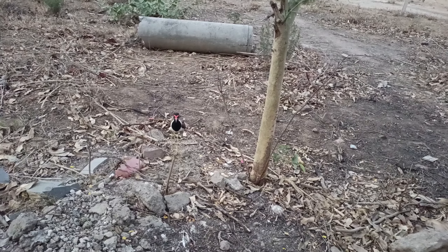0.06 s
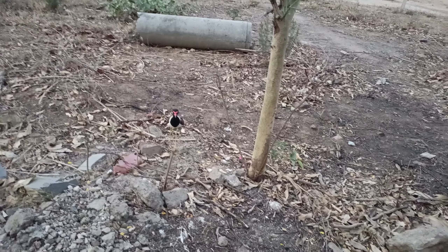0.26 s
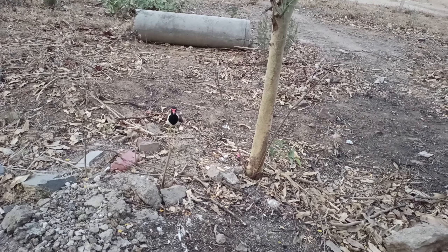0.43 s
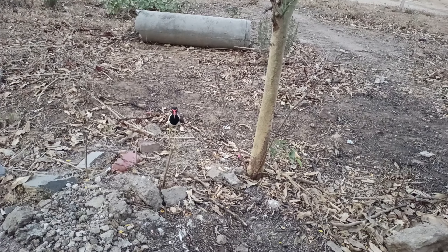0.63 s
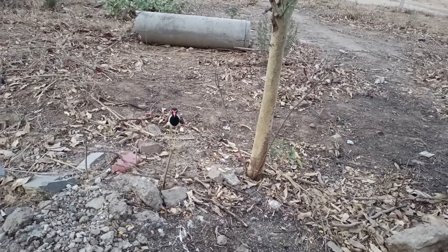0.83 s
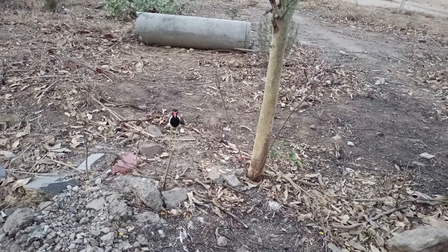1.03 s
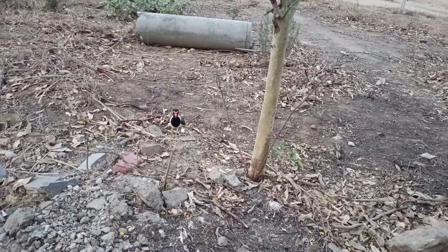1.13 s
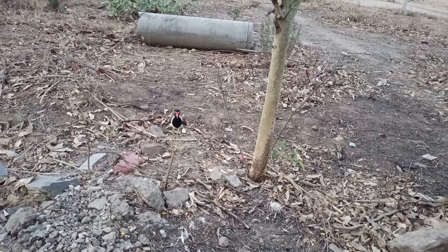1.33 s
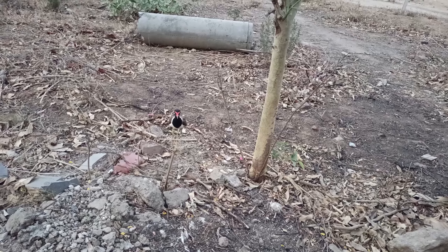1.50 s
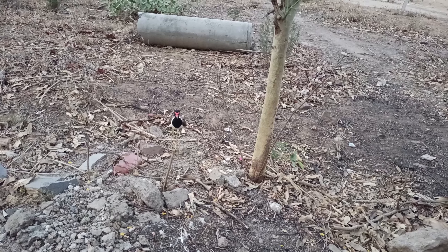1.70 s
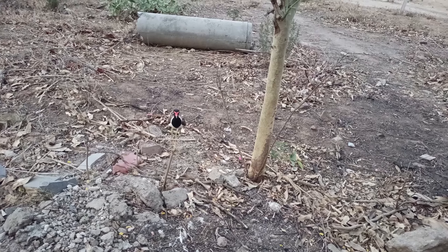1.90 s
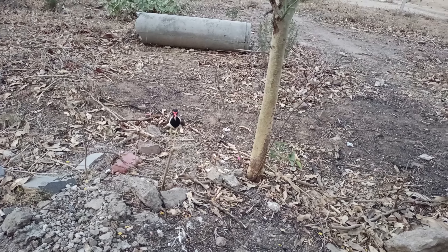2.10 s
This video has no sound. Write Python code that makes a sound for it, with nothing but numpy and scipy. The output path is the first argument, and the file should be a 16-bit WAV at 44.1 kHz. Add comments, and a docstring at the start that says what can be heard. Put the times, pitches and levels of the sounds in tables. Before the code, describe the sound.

A lapwing gives three short, loud calls left of the microphone, at about 0.2, 0.7 and 1.7 seconds. Each lasts a tenth of a second, rising from a lower note through a rasping trill to a higher note, with a soft overload thump and a ringing half-second echo. Faint high insect hiss runs throughout in the open air, with scattered distant bird chatter and whistles on the left.

```python
"""Faint insect hiss and far birds' chatter and whistles come first, over open, rubbly ground.
Then a lapwing gives three sharp calls, left of the microphone, each followed by a ringing echo.
Each uses both sides of the syrinx: a low note, a fast trill in which a high voice breaks in,
then the high voice alone. The calls overload the microphone into a soft thump."""
import sys
import numpy as np
from scipy import signal
from scipy.fft import rfft, irfft
from scipy.io import wavfile

SR = 44100
rng = np.random.default_rng(int(sys.argv[2]) if len(sys.argv) > 2 else 0)


def generate_wav(signal):
    """Clip the signal to [-1, 1] and save it as 16-bit WAV at the path in sys.argv[1]."""
    frames = np.transpose(np.atleast_2d(signal))
    scaled = np.clip(frames, -1, 1) * 32767
    pcm = np.round(scaled).astype(np.int16)
    wavfile.write(sys.argv[1], SR, pcm)


N = 94815

# spectra of the open air and of the insect chorus: f/Hz, relative level/dB
AIR_SPECTRUM = [(25, -29), (60, -7), (120, -1), (250, -10), (600, -12), (1200, -21), (3000, -24.5),
                (6000, -33), (10000, -49), (16000, -67)]
INSECT_SPECTRUM = [(6800, -45), (7500, -19), (8100, -7.5), (8500, -3), (9000, 2), (9600, -4), (9850, -36),
                   (10500, -49.5)]
# far birds' bouts of harsh chatter: t/s, length/s, centre f/Hz, level/dB
CHATTER_BOUTS = [(-.06, .13, 2288, -49.5), (-.04, 0.095, 3240, -68), (0.043, 0.16, 2104, -64),
                 (0.376, 0.084, 2348, -49.5), (0.88, 0.24, 2198, -54), (1.36, 0.093, 3440, -74),
                 (1.086, .22, 2380, -59), (1.246, .19, 2210, -64.5), (1.79, .25, 2205, -50.5),
                 (1.998, 0.3, 2252, -52.5)]
# far birds' whistles: t/s, length/s, first f/Hz, last f/Hz, width/Hz, level/dB
FAR_WHISTLES = [(0.032, 0.16, 3690, 3010, 442, -65.5), (0.134, 0.07, 973, 1010, 90.8, -68),
                (0.532, 0.23, 2675, 2768, 240.4, -60.5), (1.29, .06, 3000, 2960, 150, -67),
                (1.362, 0.3, 2480, 2497, 110, -60.5)]
# lapwing calls: start t/s, first trill pulse t/s, high voice takeover t/s, end t/s, trill f/Hz, level/dB
CALLS = [(0.2004, 0.2282, .2645, .2895, 132.8, -1), (0.741, 0.7679, .8125, .8385, 134.1, -1),
         (1.6554, 1.6844, 1.7075, 1.7375, 123.6, -1.5)]
# harmonics from the first up (low voice, high voice in the trill, high voice alone): relative level/dB
LOW_VOICE = [-15, -4.5, -9.5, -5, 0, -7.5, -15.5, -17, -15, -20.5, -15, -11.5]
TRILL_VOICE = [-34.5, -31, -9, 2, -20, -16.5, -11.5, -26, -11.5]
HIGH_VOICE = [-15.5, -12, -7, -0.5, -15, -11, -11, -35.5, -13]
# rasp of the trill: f/Hz, relative level/dB
RASP_SPECTRUM = [(500, -30.5), (1900, -26), (2750, -2), (3200, -4), (3600, -13), (4100, -12), (4500, -10.5),
                 (5300, -4), (6100, -4.5), (7000, 0), (8300, -8), (15500, -9.5)]
TAIL_BANDS = [(1310, -30, .27), (1390, -10, .36), (1600, -19.5, 0.28), (1750, -3, .27), (2045, -15, 0.27),
              (2430, -12.5, 0.45), (2688, -1, 0.6), (3050, -8, 0.4), (3320, -5, 0.39), (3650, -14.5, 0.5),
              (4150, -13.5, 0.25), (4370, -31.5, 0.14), (4740, -14.5, .25), (5024, -13.5, 0.39),
              (5700, -12, .27), (6380, -9.5, 0.27), (8146, -15.5, 0.17), (12100, -15.5, .12),
              (15500, -11, .1)]
# the lapwing on the microphone's right side against its left: f/Hz, level/dB
RIGHT_SIDE = [(1400, -6.5), (2700, -10.5), (3800, 1.5), (5100, 1.5), (6700, -3.5), (8500, -6.5),
              (10200, -8.5), (13500, -18.5), (15300, -9)]
# thump of the overloaded microphone: f/Hz, relative level/dB
THUMP_SPECTRUM = [(35, -45), (75, -4), (125, 0.5), (270, -2.5), (500, -5.5), (800, -21.5), (1300, -70),
                  (2500, -72)]
# its knocks: t/s, level before the low-pass/dB, low-pass f/Hz
MIC_KNOCKS = [(0.236, -29, 500), (.7678, -25.5, 1200), (1.685, -33, 900)]
# spectrum of a knock: f/Hz, relative level/dB
KNOCK_SPECTRUM = [(30, -15), (150, 14), (500, 6), (1000, 4), (1500, 0), (3000, -40)]

CHIRPS_PER_S, CHIRP_S, CHIRP_SPREAD_HZ, CHIRP_GLIDE_HZ, CHIRP_WIDTH_HZ = 105, .06, 520, 180, 170
LOW_HZ, LOW_END_HZ, LOW_BEND, TRILL_PULL_HZ = 1271, 1446, 1.45, 66.5
HIGH_HZ, HIGH_TOP_HZ, HIGH_SAG_HZ, PULSE_FALL_HZ = 1670.6, 1702.6, 112.7, 89.2
CLEAN_JITTER, TRILL_JITTER, PULSE_JITTER, JITTER_HZ = .0043, .022, .012, 550
ATTACK_S, ONSET_DECAY_S, ONSET_SUSTAIN, RELEASE_S = .00272, .0082, .43, .00895
SNAP_S, HANDOVER_S, BODY_S, FLICK_S = .004, .0126, .0043, .02018
PULSE_WIDTH_CYCLES, LOW_IN_TRILL, RASP_BETWEEN, RASP_HELD = .1661, .322, .25, .15
LOW_DB, OCTAVE_DB, PULSE_DB, HIGH_DB, RASP_DB, SNAP_DB = -13, -28.5, -11, -11.5, -17, -16
PULSE_FADE_DB, FLICK_FADE_DB, BODY_START_DB = -4, -4.5, -20
DISPERSION_RAD = .2  # the throat delays each harmonic differently
ECHO_EARLY, ECHO_BUILD_S, ECHO_HOLD_S, SCATTER_DB, SCATTER_DECAY_S = .23, .18, .19, -12.5, .006


def amp(db):
    """Decibels to gain."""
    return 10 ** (np.asarray(db) / 20)


def unit_rms(x):
    """Scales to rms 1."""
    return x / np.sqrt(np.mean(x ** 2) + 1e-20)


def lookup(points, hz, column=1):
    """Reads one column of a table along log frequency."""
    table = np.transpose(points)
    return np.interp(np.log(hz + 1), np.log(table[0]), table[column])


def ramp(u):
    """Smooth step from 0 to 1."""
    return np.sin(np.pi / 2 * np.clip(u, 0, 1)) ** 2


def add(mix, start, sound):
    """Mixes a sound in at a time in seconds, cut to fit."""
    at = round(start * SR)
    part = mix[max(at, 0):][:max(len(sound) + min(at, 0), 0)]
    part += sound[max(-at, 0):][:len(part)]


def colour(x, spectrum, size=4096):
    """Minimum-phase filter with the given spectrum."""
    log_gain = np.log(amp(lookup(spectrum, abs(np.fft.fftfreq(size, 1 / SR)))))
    taps = np.fft.ifft(np.exp(signal.hilbert(log_gain).conj())).real[:size // 2]
    return signal.fftconvolve(x, taps)[:len(x)]


def noise(count, spectrum):
    """Coloured noise at rms 1."""
    return unit_rms(colour(rng.standard_normal(count), spectrum))


def wander(count, hz):
    """Random motion up to about the given rate."""
    rolloff = np.exp(-(np.fft.rfftfreq(count, 1 / SR) / hz) ** 2)
    return unit_rms(irfft(rfft(rng.standard_normal(count)) * rolloff, count))


def air(db=-70):
    """Very faint rumble of the open air."""
    return amp(db) * noise(N, AIR_SPECTRUM)


def insects(db=-54, throb_hz=76, depth=.15):
    """A steady high chorus in the background, with a faint fast throb."""
    throb = 1 + depth * np.cos(2 * np.pi * throb_hz * np.arange(N) / SR)
    return amp(db) * unit_rms(colour(rng.standard_normal(N) * throb, INSECT_SPECTRUM))


def far_note(length, first_hz, last_hz, width_hz, db):
    """A bird's note, smeared by distance into a narrow band that swells and fades."""
    count = int(length * SR)
    phase = 2 * np.pi * np.cumsum(np.linspace(first_hz, last_hz, count)) / SR
    band = wander(count, width_hz / 2) * np.cos(phase) + wander(count, width_hz / 2) * np.sin(phase)
    return amp(db) * band * signal.windows.tukey(count, .4)


def far_birds():
    """Bouts of overlapping short chirps, and a few whistles, far from the microphone."""
    out = np.zeros(N)
    for start, length, hz, db in CHATTER_BOUTS:
        count = max(int(length * CHIRPS_PER_S), 1)
        times = np.linspace(start, start + length - CHIRP_S, count)
        for at, (pitch, glide) in zip(times, rng.uniform(-1.1, 1, (count, 2))):
            first_hz = hz + CHIRP_SPREAD_HZ * pitch
            last_hz = first_hz + CHIRP_GLIDE_HZ * glide
            chirp = far_note(CHIRP_S, first_hz, last_hz, CHIRP_WIDTH_HZ, db - 7 * pitch ** 2)
            add(out, at, chirp / np.sqrt(CHIRPS_PER_S * CHIRP_S / 2))
    for start, *whistle in FAR_WHISTLES:
        add(out, start, far_note(*whistle))
    return out


def voice(hz, harmonics, body_db=0):
    """One side of the syrinx: harmonics on a pitch curve, the lowest two shifted by body_db."""
    phase = 2 * np.pi * np.cumsum(hz) / SR
    stack = sum(amp(db + body_db * (k < 2)) * np.cos((k + 1) * phase + DISPERSION_RAD * k * k)
                for k, db in enumerate(harmonics))
    return stack / np.sqrt(np.sum(amp(harmonics) ** 2) / 2)


def call(start, trill, takeover, end, trill_hz, db):
    """A snap, a low note that roughens, a rasping trill of both voices, a high note that flicks down."""
    t = np.arange(start, end, 1 / SR)
    cycle = ((t - trill) * trill_hz + .5) % 1 - .5
    beat = np.exp(-.5 * (cycle / PULSE_WIDTH_CYCLES) ** 2)
    held = ramp((t - takeover) * trill_hz * 2 + 1)
    pulse = beat * ramp((t - trill) * trill_hz * 2 + 2) * (1 - held)
    low_on = 1 - ramp((t - takeover) / HANDOVER_S)
    rough = ramp((t - start) / (trill - start)) * low_on

    # the low voice climbs until the high one takes over; its octave swells between the pulses
    climb = np.minimum((t - start) / (takeover - start), 1) ** LOW_BEND
    low_hz = LOW_HZ + (LOW_END_HZ - LOW_HZ) * climb + TRILL_PULL_HZ * rough * (beat - .5)
    low_hz *= 1 + (CLEAN_JITTER + TRILL_JITTER * rough) * wander(len(t), JITTER_HZ)
    onset = ONSET_SUSTAIN + (1 - ONSET_SUSTAIN) * np.exp(-((t - start) / ONSET_DECAY_S) ** 2)
    duck = 1 - (1 - LOW_IN_TRILL) * (pulse + held)
    low = voice(low_hz, LOW_VOICE) * onset * low_on * duck
    octave = np.cos(2 * np.pi * np.cumsum(2 * low_hz) / SR + DISPERSION_RAD)
    octave *= rough * (1 - beat) * (1 - held)

    # the high voice steadies and gains its two lowest harmonics as the closing flick begins
    flick = np.clip((t - end) / FLICK_S + 1, 0, 1)
    body = ramp((t - end + FLICK_S) / BODY_S + .5)
    high_hz = HIGH_HZ + (HIGH_TOP_HZ - HIGH_HZ) * body
    high_hz -= PULSE_FALL_HZ * cycle * (1 - held) + HIGH_SAG_HZ * flick ** 2
    high_hz *= 1 + (CLEAN_JITTER * body + PULSE_JITTER * (1 - body)) * wander(len(t), JITTER_HZ)
    pulses = voice(high_hz, TRILL_VOICE) * pulse * amp(PULSE_FADE_DB * (t - trill) / (takeover - trill))
    high = voice(high_hz, HIGH_VOICE, BODY_START_DB * (1 - body)) * held * amp(FLICK_FADE_DB * flick)

    snap = amp(SNAP_DB) * np.exp(-(t - start) / SNAP_S)
    rasp = amp(RASP_DB) * (rough * (RASP_BETWEEN + pulse) + RASP_HELD * held)
    hiss = noise(len(t), RASP_SPECTRUM) * (snap + rasp)
    voices = amp(LOW_DB) * low + amp(OCTAVE_DB) * octave + amp(PULSE_DB) * pulses + amp(HIGH_DB) * high
    gate = ramp((t - start) / ATTACK_S) * ramp((end - t) / RELEASE_S)
    return amp(db) * gate * (voices + hiss)


def lapwing(left_lag_s=.00122, right_echo_db=-2.5):
    """The calls and their echo; they reach the microphone's left side louder and a little later."""
    calls = np.zeros(N)
    for row in CALLS:
        add(calls, row[0], call(*row))
    left = np.roll(calls, round(left_lag_s * SR)) + echo(calls)
    right = colour(calls + amp(right_echo_db) * echo(calls), RIGHT_SIDE)
    return np.array([left, right])


def echo(x, reflections_per_s=3000):
    """Quick scatter, then a briefly held echo tail, its treble cut short as by noise suppression."""
    t = np.arange(SR) / SR
    taps = rng.standard_normal(SR) * (rng.random(SR) < reflections_per_s / SR)
    build = ECHO_EARLY + (1 - ECHO_EARLY) * ramp(t / ECHO_BUILD_S)  # far surfaces answer late
    taps *= build * ramp(t / .0027)
    hz, times, bands = signal.stft(taps, SR, nperseg=512)
    t60 = lookup(TAIL_BANDS, hz, column=2)[:, None]
    fall = amp(-60 * (np.hypot(times, ECHO_HOLD_S) - ECHO_HOLD_S) / t60)
    fall *= amp(lookup(TAIL_BANDS, hz))[:, None] / np.sqrt(np.mean(fall ** 2, axis=1, keepdims=True))
    tail = signal.istft(bands * fall, SR, nperseg=512)[1][:SR] / np.linalg.norm(taps)
    scatter = taps * np.exp(-t / SCATTER_DECAY_S)
    return signal.fftconvolve(x, tail + amp(SCATTER_DB) * scatter / np.linalg.norm(scatter))[:N]


def thump(stereo, knee=.1, gain_db=8.5):
    """The overloaded microphone turns the pulsing of peaks above the knee into a low thump."""
    excess = np.maximum(abs(stereo) - knee, 0) ** 2
    return amp(gain_db) * np.array([colour(side, THUMP_SPECTRUM, size=1024) for side in excess])


def knocks(decay_s=.0014):
    """Short dull knocks of the microphone under the sharpest trill pulses."""
    out, t = np.zeros(N), np.arange(0, .02, 1 / SR)
    for start, db, top_hz in MIC_KNOCKS:
        knock = np.exp(-t / decay_s) * noise(len(t), KNOCK_SPECTRUM)
        lowpass = signal.butter(6, top_hz, fs=SR, output="sos")
        add(out, start, amp(db) * signal.sosfilt(lowpass, knock))
    return out


def scene():
    """The lapwing in front, far birds well to the left, insects and open air on both sides."""
    left = far_birds() + insects() + air()
    right = amp(-24.5) * far_birds() + amp(-3.5) * insects() + amp(-9.5) * air()
    return lapwing() + np.array([left, right])


def record(dry):
    """Lopsided microphone overload adds thump, knocks and grit, mostly on the left; then a band limit."""
    squashed = np.tanh(dry)
    highpass = signal.butter(4, 7000, "high", fs=SR, output="sos")
    grit = .39 * signal.sosfilt(highpass, squashed ** 2)
    overload = (thump(squashed) + knocks() + grit) * amp([[0], [-10]])  # left, right
    band_limit = signal.firwin(255, cutoff=15850, window=("kaiser", 9), fs=SR)
    return signal.oaconvolve(squashed - overload, band_limit[None], "same")


dry = scene()
out = record(dry)
generate_wav(out)
```